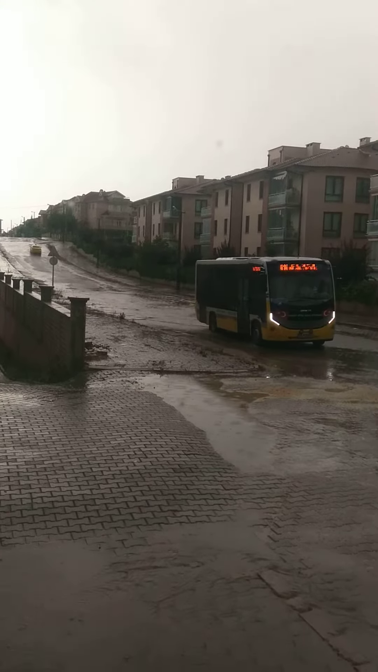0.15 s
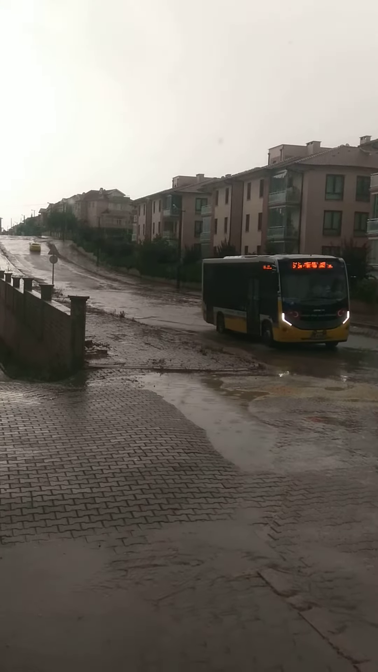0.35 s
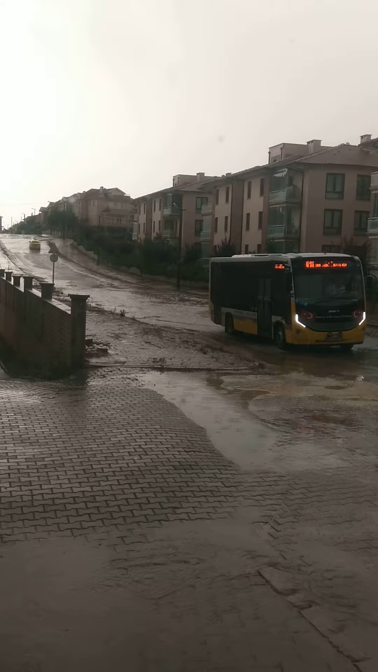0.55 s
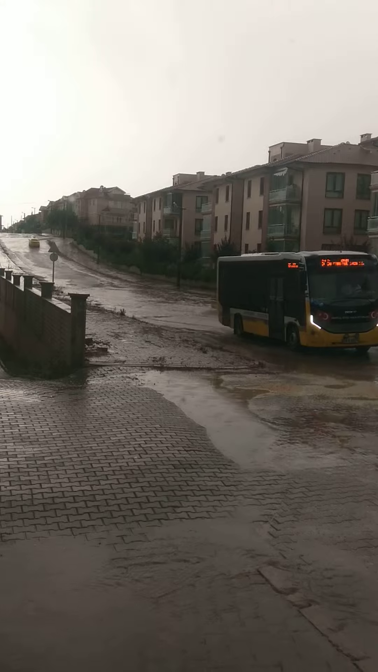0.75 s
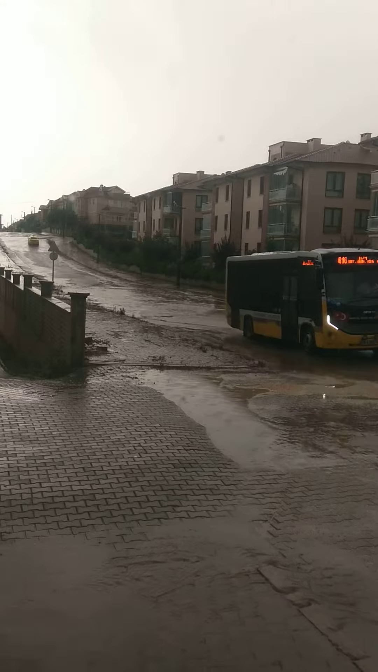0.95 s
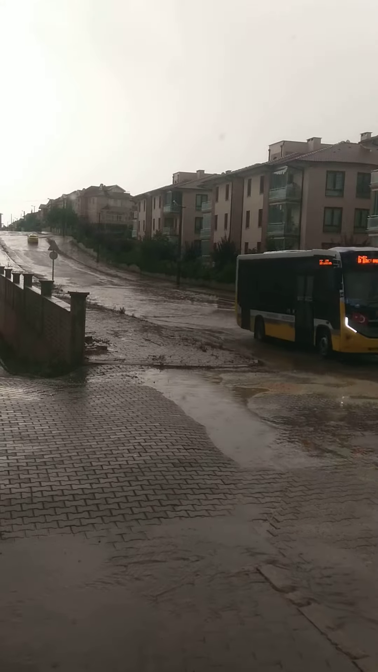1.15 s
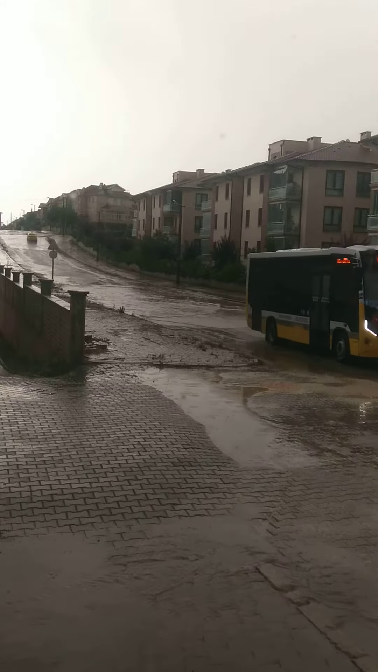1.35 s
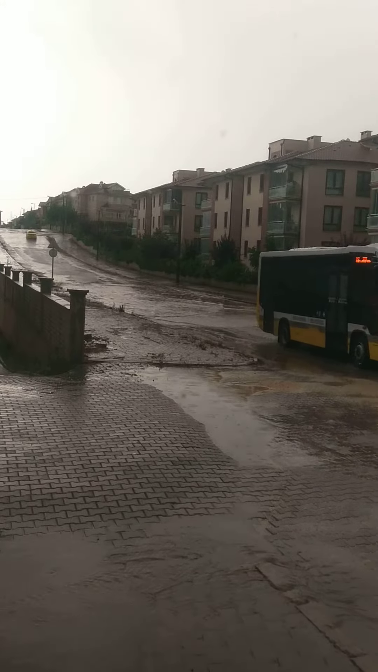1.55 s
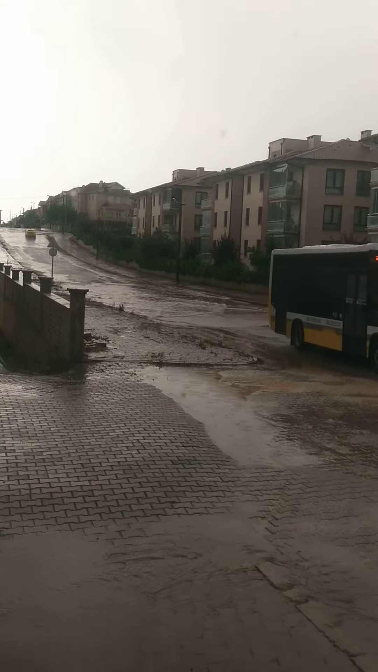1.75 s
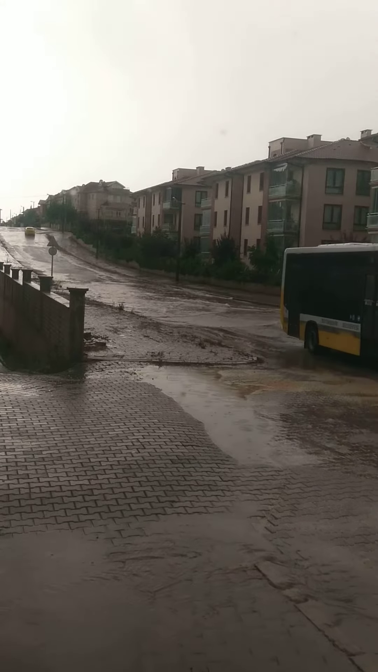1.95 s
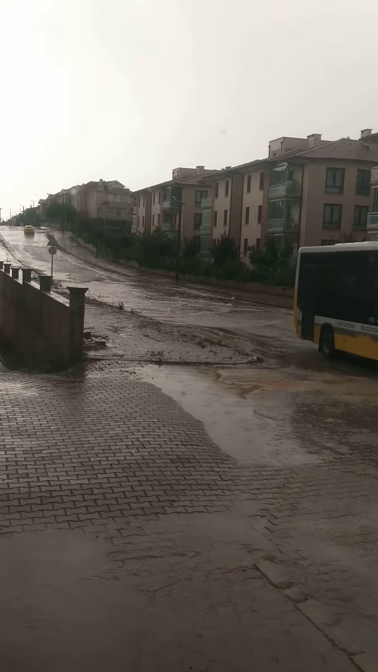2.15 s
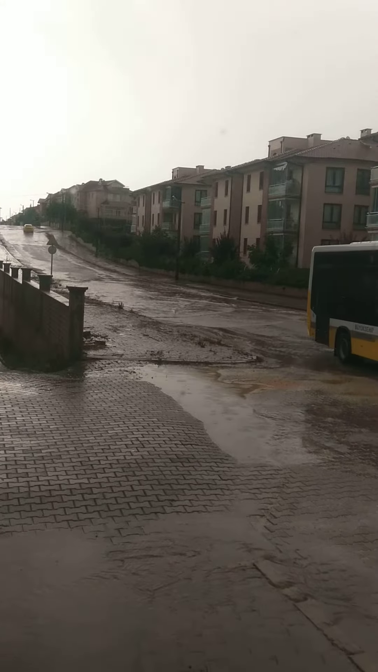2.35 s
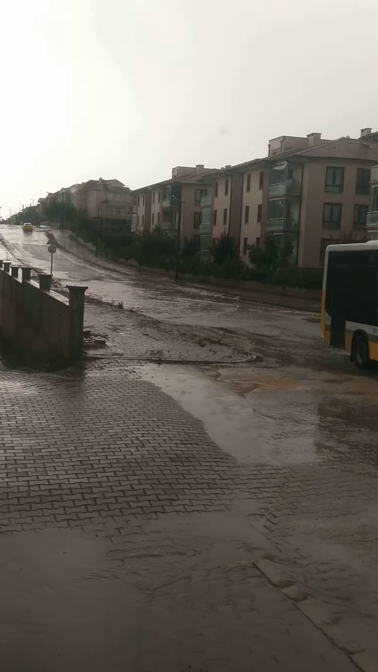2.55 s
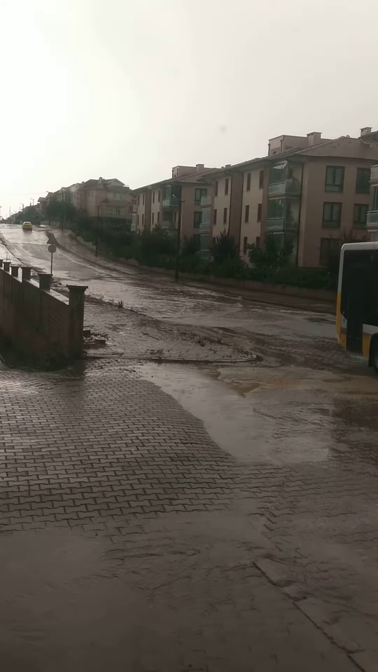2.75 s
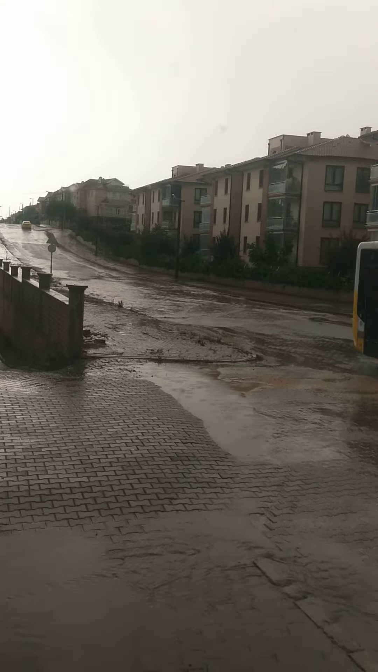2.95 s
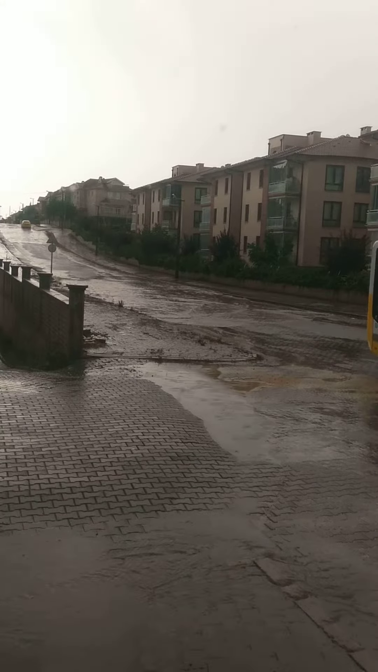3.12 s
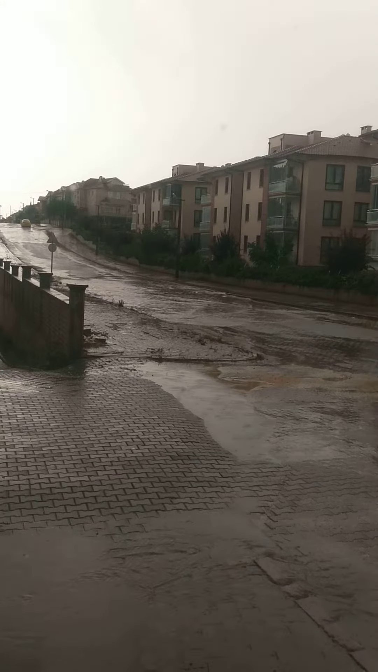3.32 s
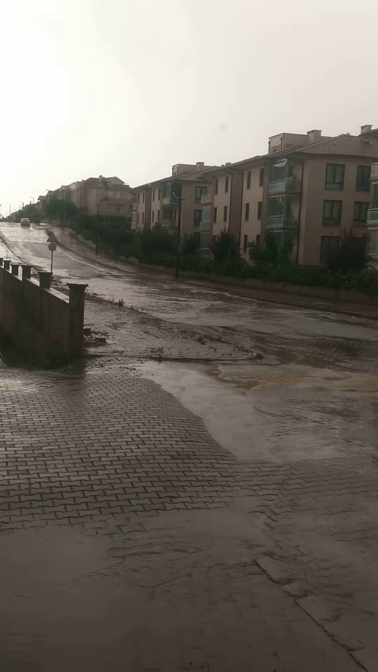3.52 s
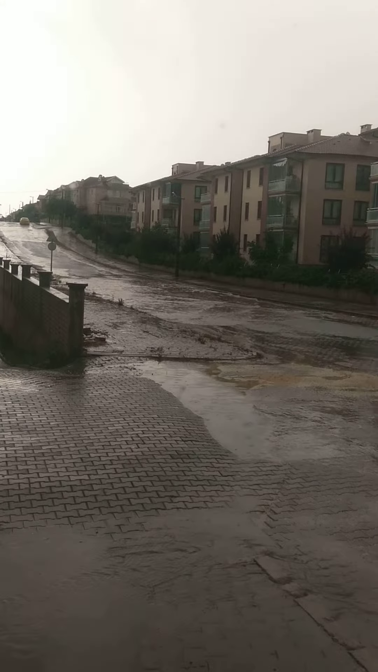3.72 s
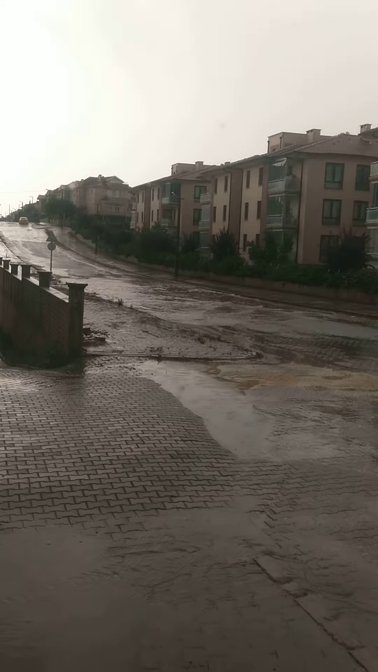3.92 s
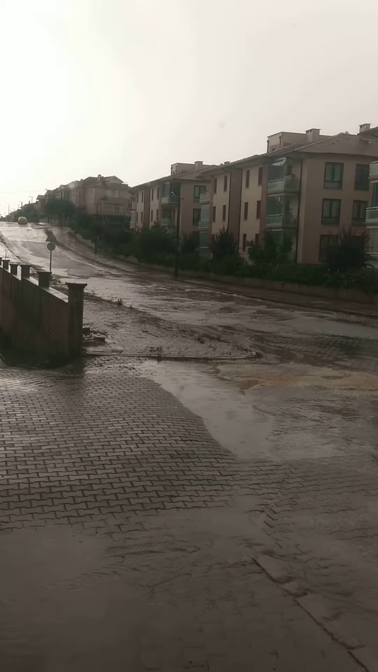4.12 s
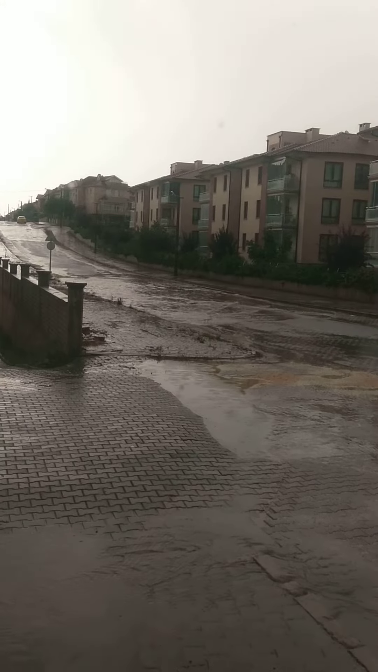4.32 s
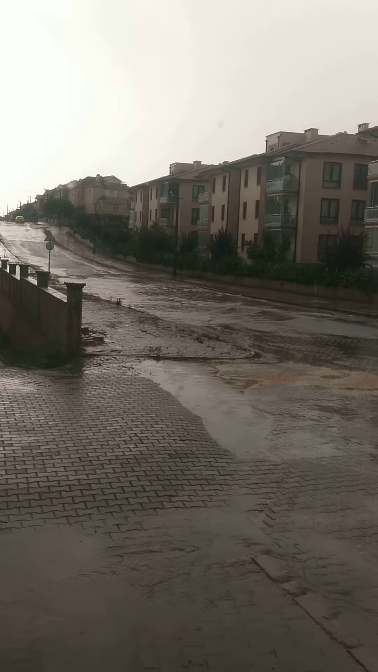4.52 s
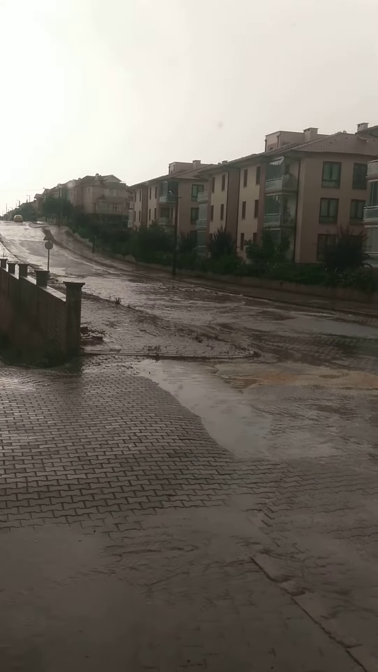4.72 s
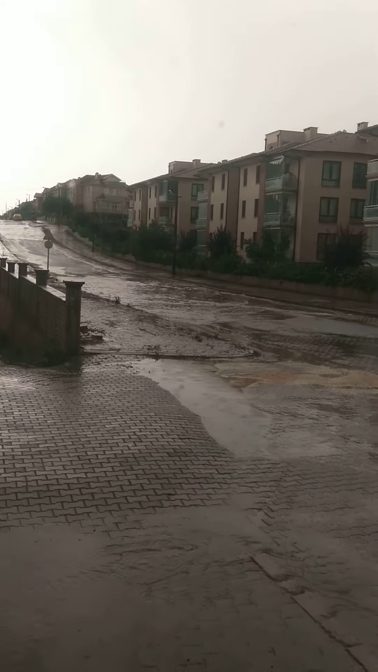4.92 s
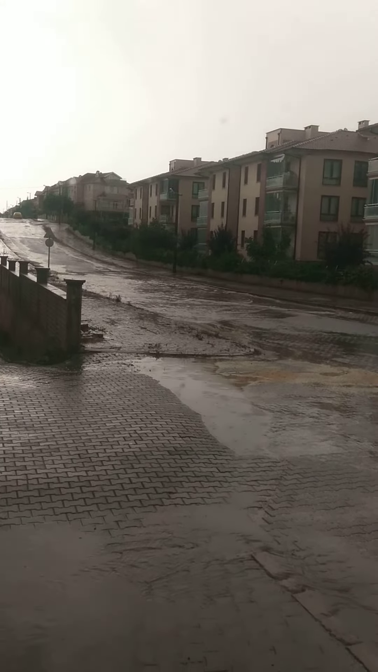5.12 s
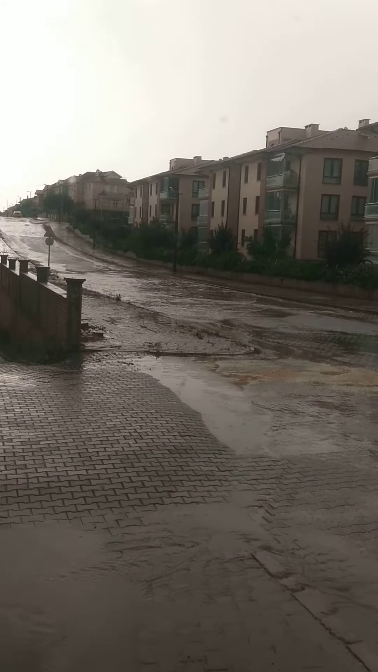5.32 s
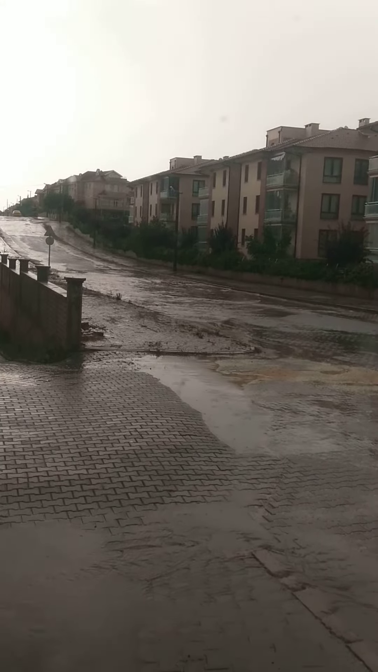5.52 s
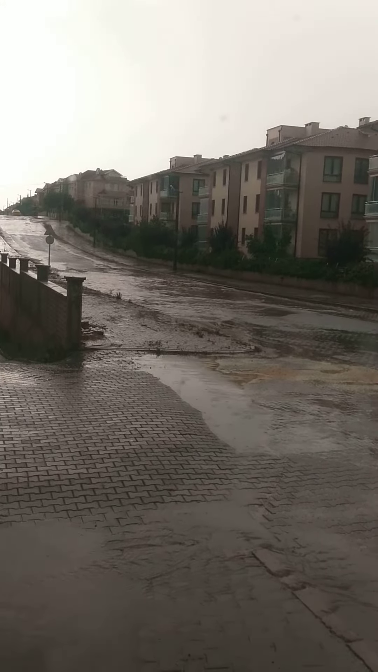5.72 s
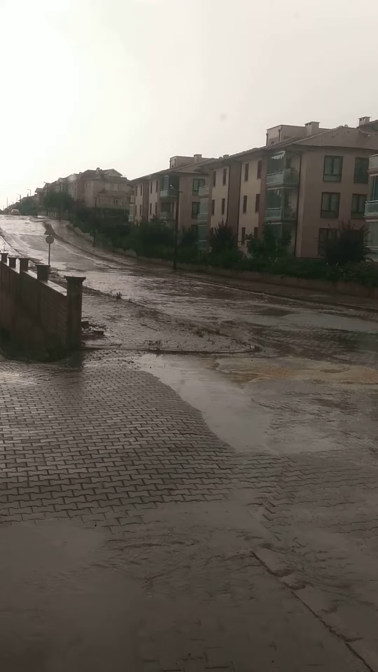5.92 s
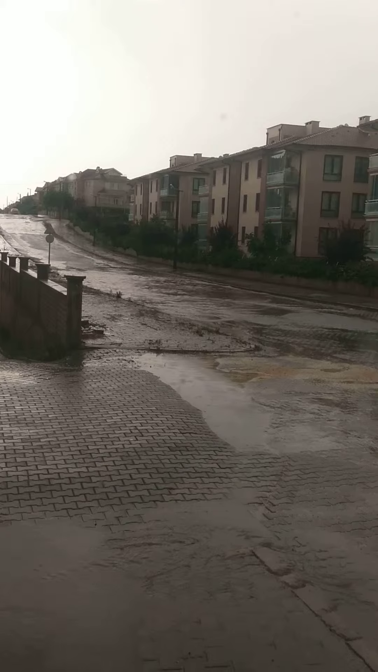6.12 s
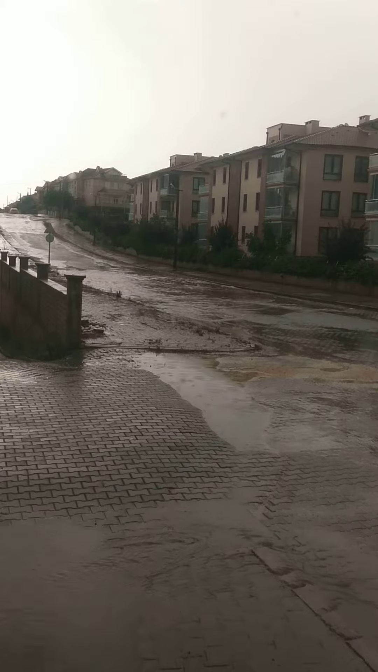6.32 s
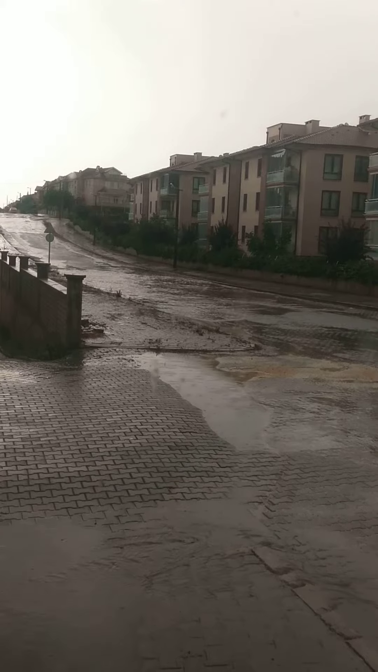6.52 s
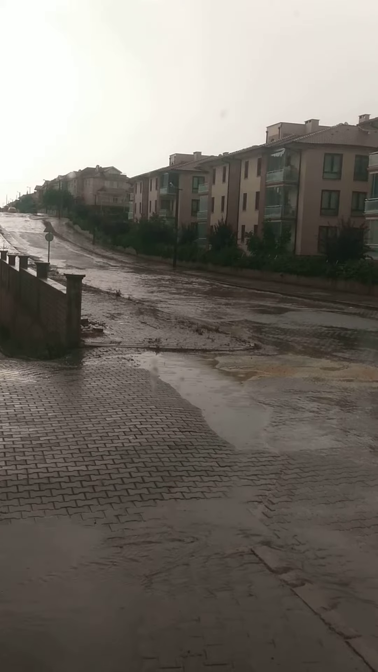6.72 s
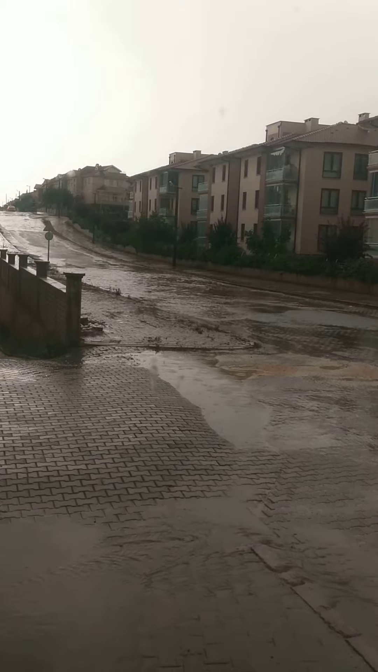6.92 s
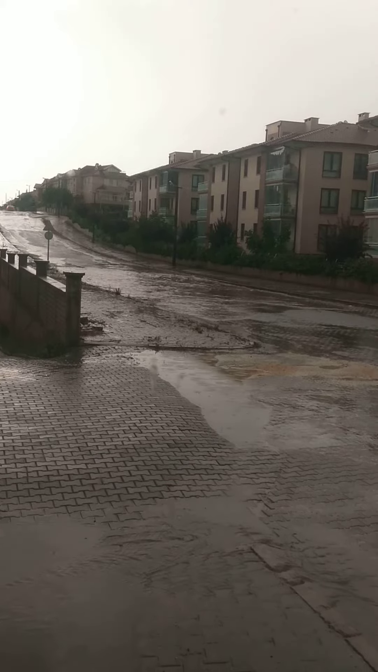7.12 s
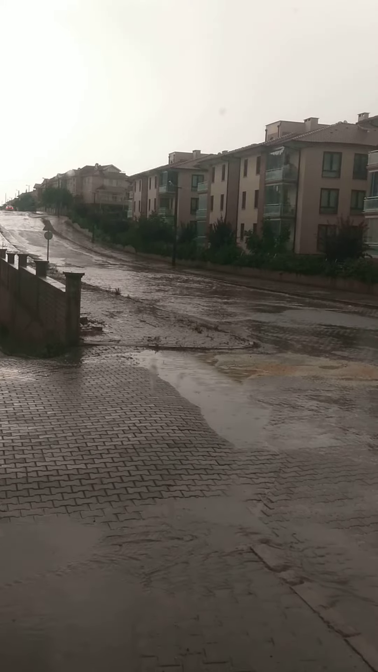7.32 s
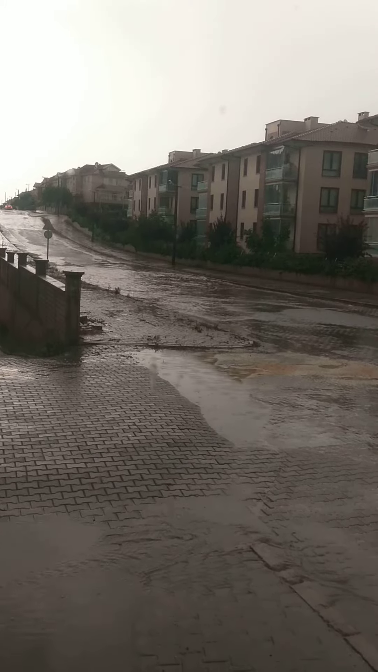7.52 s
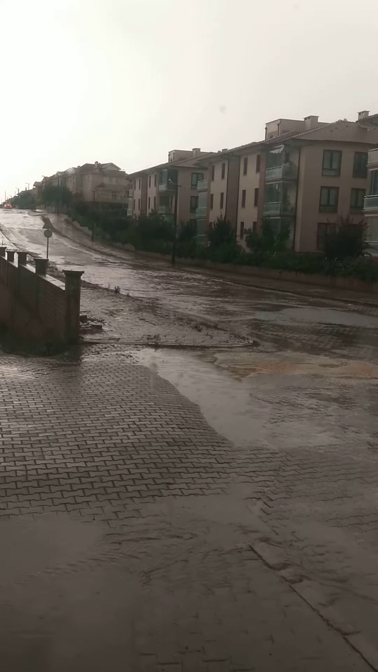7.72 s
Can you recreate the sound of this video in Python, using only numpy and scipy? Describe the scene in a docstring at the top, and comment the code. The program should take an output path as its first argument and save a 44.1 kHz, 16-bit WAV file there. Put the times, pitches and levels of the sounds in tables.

```python
"""Inside a parked car in the rain, the four-cylinder engine idles and drops tick on the glass.
A bus rolls past through standing water: its hum climbs, water sloshes and wheels thump into a dip.
By 3 s the bus has slowed to idle, and by 5.4 s it has faded, while one cylinder of the car starts
to knock harder. From about 6 s a low rumble like thunder swells; near the end a splash hits the door
and a thin whine comes up. The left microphone faces the road and hears it all a little late."""
import sys
import numpy as np
from scipy import signal
from scipy.fft import rfft, irfft
from scipy.io import wavfile
from scipy.ndimage import uniform_filter1d

SR = 44100
rng = np.random.default_rng(int(sys.argv[2]) if len(sys.argv) > 2 else 0)


def transcribe(u):
    """Save the signal u as a 16-bit wav file named by the first command-line argument.

    u: samples, shape (n,) or (channels, n), limited to [-1, 1]; the rate is SR.
    q: integer samples, one column per channel.
    """
    v = np.clip(np.atleast_2d(u).T, -1, 1)
    q = np.round(v * 32767).astype(np.int16)
    wavfile.write(sys.argv[1], SR, q)


N = 342216

# the bus engine: t/s, firing rate/Hz, level/dB
BUS_ENGINE = [(0, 104.9, -41.5), (.22, 106.5, -35), (.4, 112.3, -39), (.72, 113.2, -36),
              (.98, 117.9, -40.5), (1.25, 116.8, -37), (1.43, 118.2, -45), (1.6, 112.7, -35.5),
              (1.8, 102.6, -29.5), (2.1, 87.8, -31), (2.3, 79, -36.5), (2.5, 70.96, -33), (2.7, 63.6, -36),
              (3.02, 52.3, -40.5), (3.35, 53.5, -36.5), (3.8, 53.18, -38), (4.3, 52.9, -42.5),
              (5, 53.5, -46), (5.4, 53, -58)]
# its tones: multiple of the firing rate, level/dB
BUS_TONES = [(1 / 2, -6), (0.99, 0), (3 / 2, -4.5), (2, -5)]
# how strongly the cabin booms with a low tone: f/Hz, level/dB
CABIN_BOOM = [(25, -27), (38, -11), (47, -2), (54, -16.5), (72, -5.5), (85, -7), (105, 1), (120, -2.5),
              (138, -17), (170, -26.5), (240, -30)]
def bus():
    """The bus hum climbs, sinks and fades; each tone swells at pitches where the cabin booms."""
    hz, level_db = curve(BUS_ENGINE)
    fade = np.clip((BUS_ENGINE[-1][0] - np.arange(N) / SR) / 0.38, 0, 1)
    levels_db = [level_db + db + over_hz(CABIN_BOOM, m * hz) for m, db in BUS_TONES]
    return fade * engine_tones(np.cumsum(hz) / SR, [m for m, _ in BUS_TONES], levels_db)


# how often the car's cylinders fire: t/s, firing rate/Hz
IDLE_RATE = [(0, 27.7), (1.3, 28.4), (2.8, 27.4), (3.5, 26.6), (4.4, 26.65), (6.4, 26.62), (7.76, 26.75)]
# the tones at 1, 2 and 3 times that rate: t/s, first level/dB, second level/dB, third level/dB
IDLE_LEVELS = [(0, -36.5, -46, -60), (.5, -44.5, -54, -57), (1.1, -39, -61, -47.5), (1.6, -38.5, -42, -51),
               (2.2, -43.5, -44.5, -52.5), (3, -41, -42, -45), (3.5, -37.5, -39.5, -43),
               (3.9, -45.5, -47.5, -49), (4.6, -44.5, -41.5, -55), (5.2, -40.5, -40, -47),
               (5.9, -36.5, -38, -43), (6.9, -38.5, -39, -39), (7.76, -37.5, -40, -43)]
# moments when the lowest tone sinks: t/s
BEAT_DIPS = [-.2, 1.22, 2.16, 2.65, 3.2, 3.74, 4.49, 5.15, 5.88, 6.72, 7.75]
def idle():
    """The car's cylinders fire in turn, making three low tones and a knock; the lowest slowly beats."""
    hard_firing_s, knock_lead_s, beat_depth = 5.601, .006, .7
    hz = curve(IDLE_RATE)[0]
    firings = np.cumsum(hz) / SR
    firings -= firings[int(hard_firing_s * SR)]  # count from a firing of the hardest cylinder
    knocks = knock(firings)
    first_db, *upper_db = curve(IDLE_LEVELS)
    beats = np.interp(np.arange(N) / SR, BEAT_DIPS, np.arange(len(BEAT_DIPS)))
    first_db += 20 * np.log10(1 - beat_depth * np.cos(2 * np.pi * beats))
    # the pressure peaks just after each knock
    return knocks + engine_tones(firings - hz * knock_lead_s, (1, 2, 3), [first_db, *upper_db])


# strength of the knock: t/s, level/dB
KNOCK_LEVEL = [(0, -58), (4, -52), (4.6, -43), (5.2, -37.5), (6.5, -37.5), (7.76, -40)]
# the four cylinders in turn, one harder than the rest: level/dB
CYLINDERS = [0, -13, -14, -6]
# the notes the dashboard rings at: f/Hz, width/Hz, level/dB
DASHBOARD_NOTES = [(455, 30, 0), (375, 30, -3), (338, 30, -3), (605, 14, -13)]
def knock(firings):
    """Each firing is a small blow that makes the dashboard ring."""
    count = np.floor(firings).astype(int)
    uneven_db = 1.2 * rng.standard_normal(N // 500)[count - count[0]]
    size_db = np.array(CYLINDERS)[count % len(CYLINDERS)] + uneven_db
    blows = np.diff(count, prepend=count[0]) * undb(size_db + curve(KNOCK_LEVEL)[0])
    dashboard = np.zeros(SR // 4)
    for hz, width, db in DASHBOARD_NOTES:
        add(dashboard, 0, undb(db) * ring(hz, np.log(1000) / np.pi / width))
    return signal.fftconvolve(blows, soften(dashboard, .004))[:N]  # the engine mounts soften the blow


# drops on the glass: t/s, ring level/dB, splat level/dB, left minus right/dB
GLASS_DROPS = [(0.0478, -70, -76, 5), (0.1002, -47.5, -76, 15), (0.3094, -57, -82, 9.0),
               (0.3892, -65, -79, 6.5), (0.6392, -60, -65, 11), (0.8629, -44.5, -71, 15),
               (0.875, -64, -66, 11), (1.045, -51, -68, 11), (1.139, -62, -67, 11), (1.1518, -46, -78, 15),
               (1.6422, -47, -71, 16), (1.6721, -47, -62, 13), (1.926, -53, -70, 12),
               (2.0767, -51, -83, 11), (2.2494, -58, -71, 10), (2.2958, -40.5, -80, 18),
               (2.4294, -65, -71, 1), (2.5396, -50, -74, 15), (2.8894, -60, -68, 11),
               (3.7093, -49, -71, 14), (3.8017, -48, -77, 17), (3.8891, -52, -75, 9.0),
               (4.133, -52, -75, 8.0), (4.1604, -49, -69, 16), (4.9212, -55, -66.5, 13),
               (5.2394, -64, -70, 7.5), (5.4094, -55, -69, 10), (5.5992, -46.5, -73, 16),
               (5.7069, -62, -70, 8), (5.7329, -53, -67, 12), (6.0594, -53, -71, 7), (6.3889, -52, -84, 12),
               (6.4822, -67, -73, 5.5), (6.5271, -48, -69, 14), (6.6089, -66, -68, 12),
               (6.9062, -50.5, -69, 15), (7.0683, -60, -63.5, 10), (7.1751, -55, -67, 11),
               (7.2035, -53, -67, 16)]
# the notes the window rings at: f/Hz, level/dB, ring time/s
GLASS_NOTES = [(4296, -8, .022), (4880, -5.5, .016), (5500, -8, .009), (3800, -13, .01)]
# the hiss of a splat: f/Hz, level/dB
SPLAT_COLOUR = [(1500, -30), (3000, -2), (5000, 1), (7500, -0.5), (12000, 1), (14500, 0)]
def drops():
    """Each drop rings the window, in a mix of notes set by where it lands, and splats into a hiss."""
    small_drops, contact_s = 50, .0008
    out = np.zeros((2, N))
    t = np.arange(SR // 12) / SR
    colour = undb(over_hz(SPLAT_COLOUR, np.fft.rfftfreq(len(t), 1 / SR)))
    burst = soften(np.exp(-t / 0.019), 0.0025)
    patter = [(when * N / SR, -68 + 8 * ring_size, -80 + 8 * splat_size, 7.5)
              for when, ring_size, splat_size in rng.random((small_drops, 3))]
    for s, ring_db, splat_db, pan_db in [*GLASS_DROPS, *patter]:
        sides = undb(np.array([[pan_db], [-pan_db]]) / 2)
        for hz, note_db, ring_s in GLASS_NOTES:
            spot = rng.standard_normal()
            note = soften(ring(hz * (1 + 0.022 * spot), ring_s), contact_s)
            add(out, s, sides * undb(ring_db + note_db + 1.5 * spot) * note)
        hiss = irfft(colour * rfft(rng.standard_normal(len(t))), len(t))
        add(out, s, sides * undb(splat_db) * hiss * burst / burst.max())
    return out


# heavier drops on the roof and trim: t/s, level/dB, f/Hz, ring time/s
ROOF_TAPS = [(3.93, -44.5, 678.4, 0.042), (4.2966, -38, 419.8, .02), (4.303, -19.5, 2200, 0.0035),
             (4.3044, -49, 910, 0.0075), (5.708, -45, 3650, 0.019)]
def roof_taps():
    """A heavy drop rings one note and adds a faint, dull rustle."""
    rustle_db, rustle_s = -24, .01
    out = np.zeros((2, N))
    t = np.arange(SR // 12) / SR
    dull = signal.butter(2, [400, 2500], "band", fs=SR, output="sos")
    soft_contact = np.hanning(11) / 5
    for s, db, hz, ring_s in ROOF_TAPS:
        rustle = signal.sosfilt(dull, rng.standard_normal((2, len(t))))
        add(out, s, undb(db + rustle_db) * rustle * np.exp(-t / rustle_s))
        add(out, s, -undb(db) * np.convolve(ring(hz, ring_s), soft_contact))
    return out


# jolts of the car body: t/s of the widest swing, level/dB
JOLTS = [(0.131, -52), (.52, -46), (.9, -35.5), (1.56, -37.5), (1.8, -38), (2.06, -30.5), (2.45, -36),
         (2.72, -34.5), (3.38, -30.5), (3.641, -26.5), (3.89, -32), (4.13, -33), (4.52, -39), (5.08, -37.5),
         (5.9, -49), (6.27, -42), (6.74, -36.5), (7.11, -38.5), (7.38, -37)]
def shake():
    """The body rocks on its springs near half the firing rate, wider with each jolt."""
    rock_hz, rise_s, fall_s = 13.3, 0.074, 0.093
    angle = 2 * np.pi * np.cumsum(rock_hz + wander(3)[0]) / SR
    size = swells([(s, db, fall_s) for s, db in JOLTS], floor_db=-59, rise=rise_s / fall_s)
    return np.sqrt(2) * size * np.sin(angle)


# the thumps: t/s, level/dB, length/s
THUMPS = [(.9, -45.5, 0.073), (2.25, -38, 0.11), (2.36, -44, 0.11)]
# the pitches in a thump: f/Hz, level/dB
THUMP_BANDS = [(144, 7), (185, 1.5), (250, -23), (287, -3.5), (425, -11)]
def wheel_thumps():
    """Wheels drop into a dip with short, low thuds."""
    return noise_bursts(THUMPS, THUMP_BANDS)


# the splash: t/s, level/dB, length/s
SPLASH = [(7.198, -50, 0.033)]
# the pitches in it: f/Hz, level/dB
SPLASH_BANDS = [(2440, 4), (3270, -1), (1510, -5), (4600, -16)]
def splash():
    """Water hits the door in one short, bright burst."""
    return noise_bursts(SPLASH, SPLASH_BANDS)


# the steady rush under the swells: t/s, level/dB, extra bass/dB
RUMBLE_BED = [(0, -60.5, 0), (1.8, -59, -1.5), (2.6, -61.5, -4.5), (4.2, -61, -8), (5.2, -62, -3),
              (6.2, -62, -2), (6.5, -61.5, 1), (6.75, -56, 4), (7, -56.5, 0.5), (7.3, -55.5, -2),
              (7.76, -51.5, 1.5)]
# its mix of low and high: f/Hz, level/dB
RUMBLE_COLOUR = [(120, -24), (200, -10), (450, 2.5), (740, -1.5), (1200, -6.5), (1700, -14), (2200, -25),
                 (3000, -34.5), (4000, -74)]
# water sloshing from the wheels: t/s of the crest, level/dB, fall time/s
SLOSHES = [(.1, -58.5, 0.091), (.6, -60, 0.024), (.93, -58, .06), (1.42, -54, 0.046), (1.58, -63, 0.051),
           (1.86, -53.5, .07), (2.27, -54, 0.26), (2.77, -58.5, 0.053), (3.62, -62, 0.053)]
# the thunder-like rolls at the end: t/s of the crest, level/dB, fall time/s
ROLLS = [(6.363, -59, 0.1), (6.57, -56, 0.033), (6.705, -51.5, 0.077), (6.886, -50.5, 0.05),
         (7.13, -48.5, 0.11), (7.24, -50, 0.1), (7.346, -52.5, 0.058), (7.517, -50.5, 0.054),
         (7.746, -48.5, 0.089)]
def rumble():
    """A rough, low rush that surges with each slosh and roll."""
    bed_db, bass_db = curve(RUMBLE_BED)
    rough = wash(RUMBLE_COLOUR, 698, 1530, flicker_db=1.87, flicker_hz=24)
    bass = signal.sosfiltfilt(signal.butter(2, 500, "low", fs=SR, output="sos"), rough)
    rush = signal.sosfiltfilt(signal.butter(2, 500, "high", fs=SR, output="sos"), rough)
    return swells(SLOSHES + ROLLS, bed_db) * (rush + undb(bass_db) * bass)


# strength of the spray: t/s, level/dB
SPRAY_LEVEL = [(0, -72.5), (.3, -67.5), (.9, -65), (1.3, -63), (1.85, -63), (2.05, -65.5), (2.3, -64),
               (2.75, -63.5), (3.07, -64.5), (3.6, -62), (3.85, -65), (4.2, -64), (5.77, -68.5),
               (6.25, -69.5), (7.2, -68.5), (7.76, -68.5)]
# its mix of low and high: f/Hz, level/dB
SPRAY_COLOUR = [(900, -3.5), (1400, 0), (2300, 0), (3000, -4), (4000, -8.5), (5600, -15), (6500, -25),
                (9000, -24.5)]
def spray():
    """Fine spray hisses off the tyres, lifting with each slosh; later it is rain on the road."""
    bed_db = curve(RUMBLE_BED)[0]
    surge = (swells(SLOSHES, bed_db) / undb(bed_db)) ** 0.25  # a quarter of each slosh's rise in dB
    hiss = wash(SPRAY_COLOUR, 1676, 4330, flicker_db=1.4, flicker_hz=12)
    return surge * undb(curve(SPRAY_LEVEL)[0]) * hiss


# strength of the drone: t/s, level/dB
DRONE_LEVEL = [(0, -51), (.32, -52), (1.2, -55), (1.8, -49.5), (2.33, -51.5), (3.05, -51.5), (3.9, -52.5),
               (4.56, -53), (5.1, -52.5), (7.2, -46), (7.76, -50)]
# its mix of low and high: f/Hz, level/dB
DRONE_COLOUR = [(5, -10.5), (20, -4.5), (41, -12), (70, -7), (100, -13.5), (145, -14), (222, -21.5),
                (290, -25), (400, -41), (600, -40.5), (1000, -48), (1500, -81)]
def drone():
    """Exhaust and road noise fill the cabin with a deep drone."""
    return undb(curve(DRONE_LEVEL)[0]) * wash(DRONE_COLOUR, 133.6, 300, flicker_db=1.66, flicker_hz=9.9)


# the rain's mix of low and high: f/Hz, level/dB
RAIN_COLOUR = [(2940, -29), (5000, -6), (6260, -6), (8040, -13), (12400, 0.5), (13700, -2), (14300, -3)]
def rain():
    """Steady rain makes a faint, high hiss."""
    return undb(-78.5) * wash(RAIN_COLOUR, 6000, 14900, flicker_db=1.1, flicker_hz=16, bands=2)


# strength of the whine: t/s, level/dB
WHINE_LEVEL = [(0, -110), (.35, -100), (.5, -88), (.7, -105), (7.15, -110), (7.35, -82), (7.76, -82)]
def whine():
    """A thin, very high tone, louder on the right."""
    tone = np.sqrt(2) * np.sin(2 * np.pi * 14000 * np.arange(N) / SR)
    return undb(curve(WHINE_LEVEL)[0]) * tone * np.array([[.4], [1.6]])


# narrow dips and peaks of the cabin: f/Hz, width/Hz, level/dB
CABIN_DIPS = [(514.3, 61, -15.5), (663.6, 56, -16.5), (813, 29, -14.5), (961, 40, -10), (218, 12, -10.5),
              (1096, 38, -8), (2960, 180, 0), (3660, 45, -1), (4030, 220, 5.5), (4500, 74, 1.5),
              (4780, 50, 4.5)]
# how much louder the road side is: f/Hz, left minus right/dB
LEFT_LEAN = [(60, 0.5), (110, 0), (200, -0.5), (370, -1), (680, -0.5), (1240, 3), (2270, 7.5), (4170, 6.0),
             (7630, 8.5), (14000, 3.5)]
def cabin(x):
    """The cabin swallows some pitches and lifts others; the treble leans to the left."""
    edge = SR // 4  # mirrored ends keep the finish from leaking into the start
    x = np.pad(x, ((0, 0), (edge, edge)), "reflect", reflect_type="odd")
    x *= signal.windows.tukey(N + 2 * edge, edge / N)
    hz = np.fft.rfftfreq(x.shape[1], 1 / SR)
    dips_db = sum(db / (1 + (2 * (hz - f) / width) ** 2) for f, width, db in CABIN_DIPS)
    lean_db = over_hz(LEFT_LEAN, hz) * np.array([[1], [-1]]) / 2
    return irfft(rfft(x) * undb(dips_db + lean_db), x.shape[1])[:, edge:-edge]


# how alike left and right are: f/Hz, likeness (1 = the same)
LIKENESS = [(20, 0.97), (180, 0.98), (350, 0.86), (700, 1), (1400, 0.43), (2800, 0.11), (5600, 0.031),
            (14000, 0.045)]
def wash(colour, lo_hz, hi_hz, flicker_db, flicker_hz, bands=4):
    """Stereo noise, scaled by its strength between lo_hz and hi_hz, in bands that flicker."""
    hz = np.fft.rfftfreq(N, 1 / SR)
    alike = np.clip(over_hz(LIKENESS, hz), 0, 1)
    shared = rfft(rng.standard_normal(N)) * np.sqrt((1 + alike) / 2)
    apart = rfft(rng.standard_normal(N)) * np.sqrt((1 - alike) / 2)
    spectrum = np.array([shared + apart, shared - apart]) * undb(over_hz(colour, hz))
    in_range = spectrum[:, (hz > lo_hz) & (hz < hi_hz)].mean(axis=0)
    spectrum /= np.sqrt(2 * np.sum(np.abs(in_range) ** 2)) / N
    place = np.clip((bands - 1) * np.log((hz + 1) / lo_hz) / np.log(hi_hz / lo_hz), 0, bands - 1)
    flicker = undb(flicker_db * (wander(flicker_hz, bands) + wander(flicker_hz)) / np.sqrt(2))
    return sum(flicker[k] * irfft(spectrum * np.clip(1 - abs(place - k), 0, 1), N) for k in range(bands))


def engine_tones(firings, multiples, levels_db, waver_db=0.8):
    """Pure tones at multiples of the firing rate, each wavering a little in level."""
    return sum(np.sqrt(2) * undb(db + waver_db * waver) * np.cos(2 * np.pi * m * firings)
               for m, db, waver in zip(multiples, levels_db, wander(11, len(multiples))))


def noise_bursts(events, bands):
    """Narrow bands of noise that swell quickly and die away."""
    out = np.zeros(N)
    for s, db, length_s in events:
        age = np.arange(SR // 2) / SR / length_s
        for hz, band_db in bands:
            narrow = signal.butter(1, [hz / 1.03, hz * 1.03], "band", fs=SR, output="sos")
            noise = signal.sosfilt(narrow, rng.standard_normal(len(age)))
            add(out, s, undb(db + band_db) * noise / noise.std() * 4 * age * np.exp(-3 * age))
    return out


def swells(crests, floor_db, rise=0.42):
    """A base level with smooth swells on top; rise is a share of the fall time."""
    t = np.arange(N) / SR
    power = undb(2 * floor_db) * np.ones(N)
    for s, db, fall_s in crests:
        power += undb(2 * db) * np.exp(-((t - s) / np.where(t < s, rise * fall_s, fall_s)) ** 2)
    return np.sqrt(power)


def ring(hz, ring_s):
    """A pure tone that dies away by 60 dB in ring_s."""
    t = np.arange(int(ring_s * SR) + 8) / SR
    return np.sin(2 * np.pi * hz * t) * 10 ** (-3 * t / ring_s)


def soften(x, rise_s):
    """Ease in the start of a sound."""
    return x * (1 - np.exp(-np.arange(len(x)) / SR / rise_s))


def wander(rate_hz, count=1):
    """Smooth random curves that stray about 1 either side of zero."""
    step = int(SR / rate_hz)
    held = np.repeat(rng.standard_normal((count, N // step + 1)), step, axis=1)[:, :N]
    return 1.495 * uniform_filter1d(uniform_filter1d(held, step, axis=1), step, axis=1)


def undb(db):
    """Turn decibels into a multiplier."""
    return 10 ** (np.asarray(db) / 20)


def curve(table):
    """Join the points of a time table, giving each column one value a sample."""
    s, *columns = np.transpose(table)
    return [np.interp(np.arange(N) / SR, s, c) for c in columns]


def over_hz(table, hz):
    """Read between the points of a frequency table, with octaves evenly spaced."""
    f, values = np.transpose(table)
    return np.interp(np.log(hz + 1), np.log(f + 1), values)


def add(out, s, x):
    """Mix in a short sound, starting at s seconds."""
    i = int(s * SR)
    out[..., i:i + x.shape[-1]] += x[..., :N - i]


def scene():
    """Engines, road and water pass through the cabin; drops, taps and the whine are heard directly."""
    background = drone() + spray() + rumble() + rain()
    vehicles = bus() + idle() + shake() + wheel_thumps() + splash()
    return cabin(vehicles + background) + drops() + roof_taps() + whine()


def record(dry):
    """The left microphone hears everything a little later; the very top of the treble is cut."""
    lag_samples, top_hz = 8, 14300
    left = np.pad(dry[0], (lag_samples, 0), "edge")[:N]
    cut = signal.ellip(10, .2, 60, top_hz, fs=SR, output="sos")
    return np.array([signal.sosfilt(cut, x, zi=signal.sosfilt_zi(cut) * x[0])[0] for x in (left, dry[1])])


dry = scene()
out = record(dry)
transcribe(out)
```